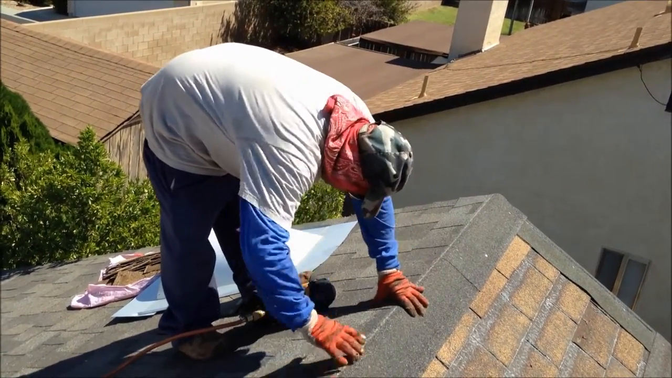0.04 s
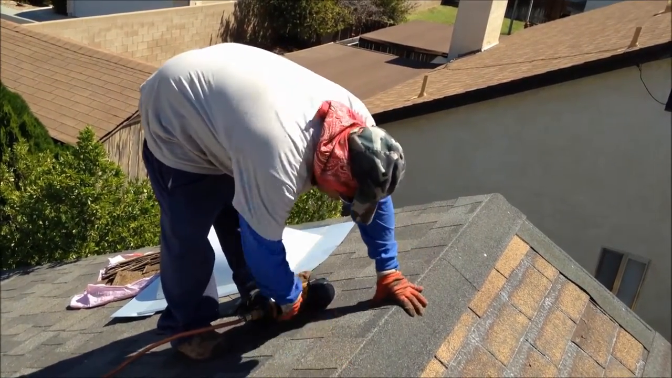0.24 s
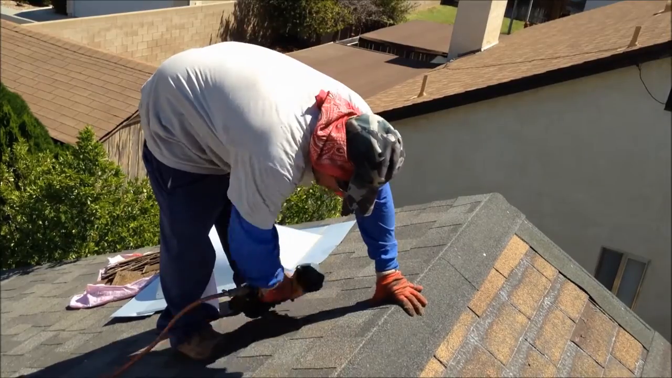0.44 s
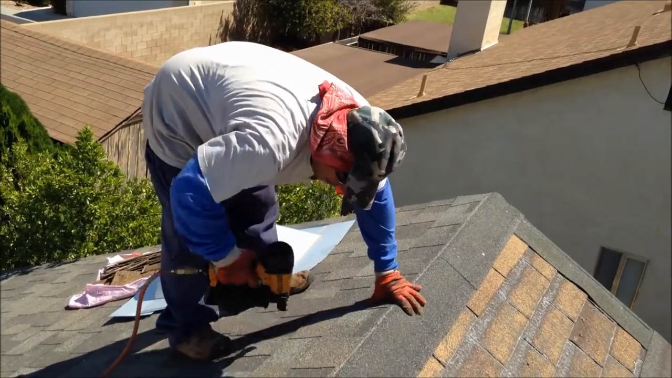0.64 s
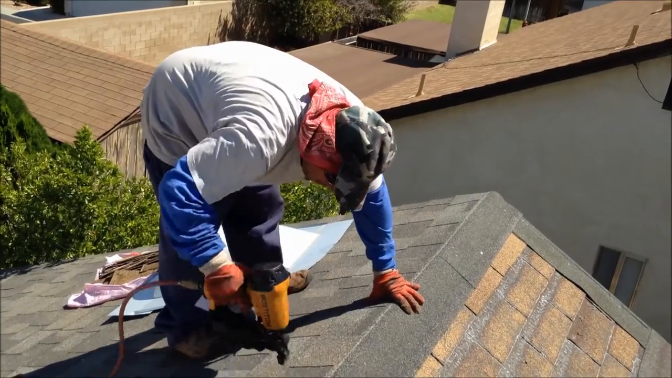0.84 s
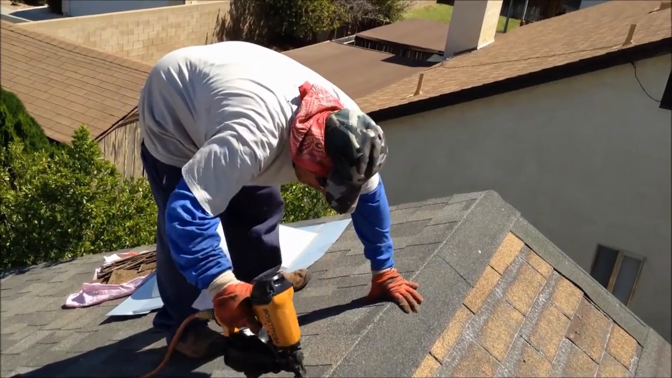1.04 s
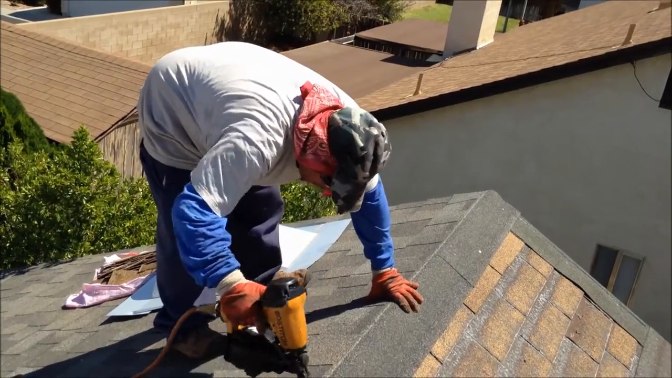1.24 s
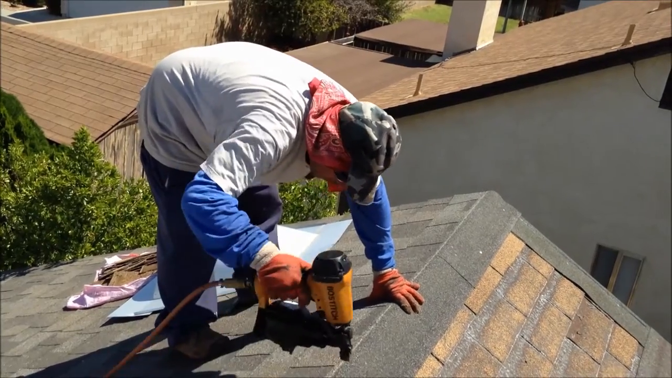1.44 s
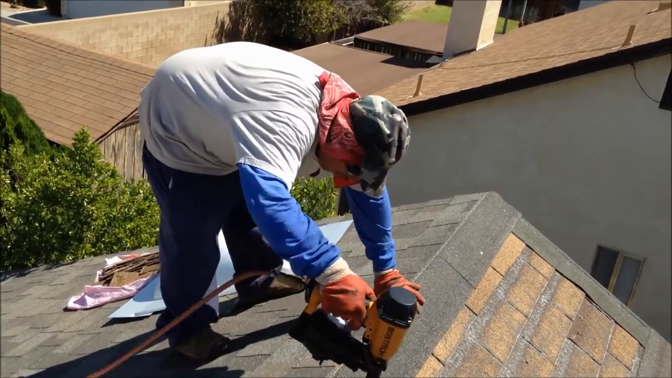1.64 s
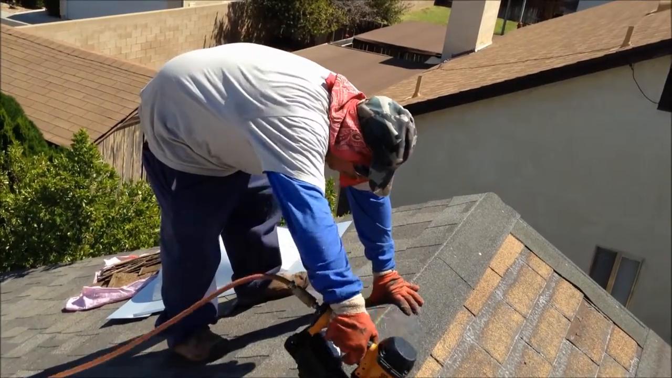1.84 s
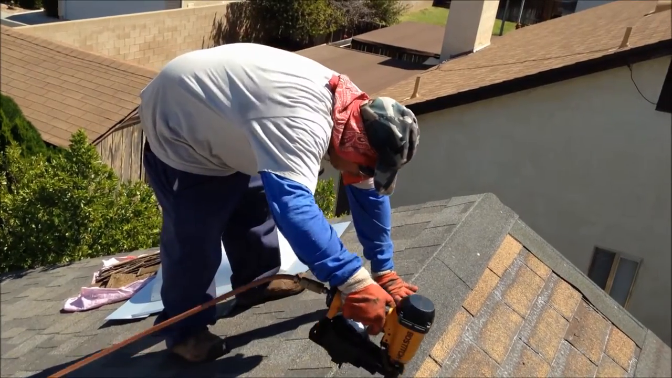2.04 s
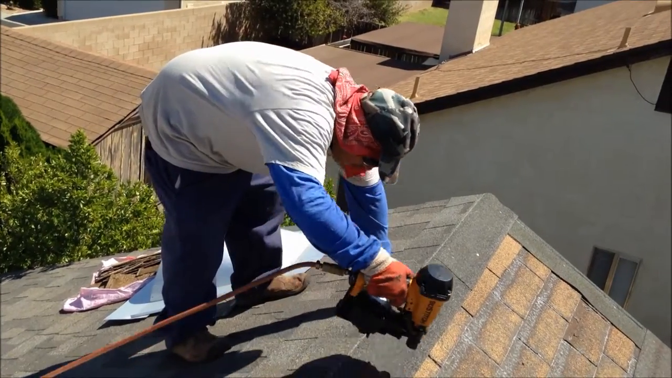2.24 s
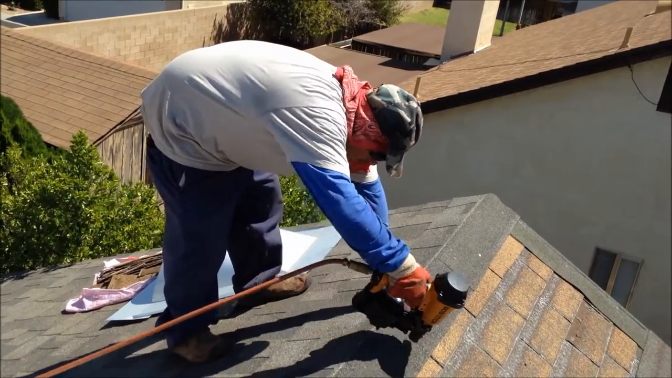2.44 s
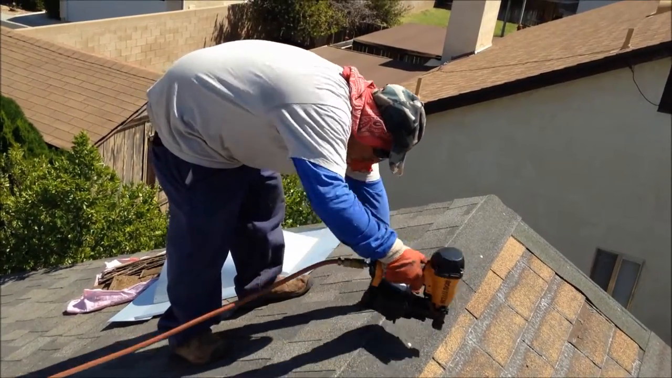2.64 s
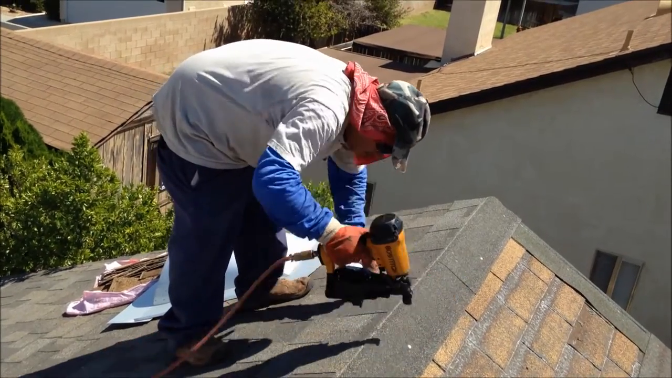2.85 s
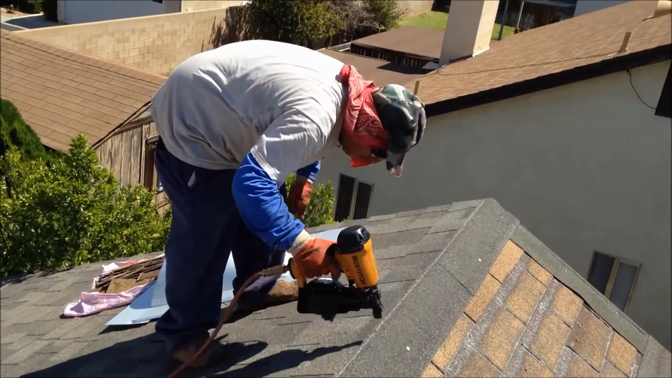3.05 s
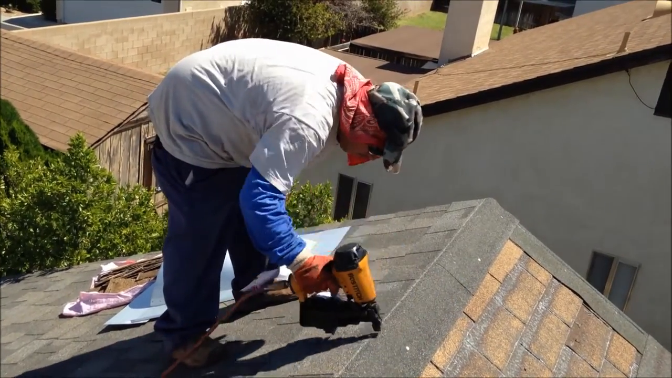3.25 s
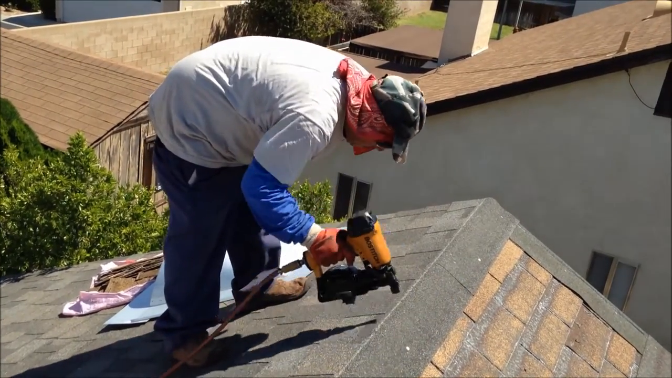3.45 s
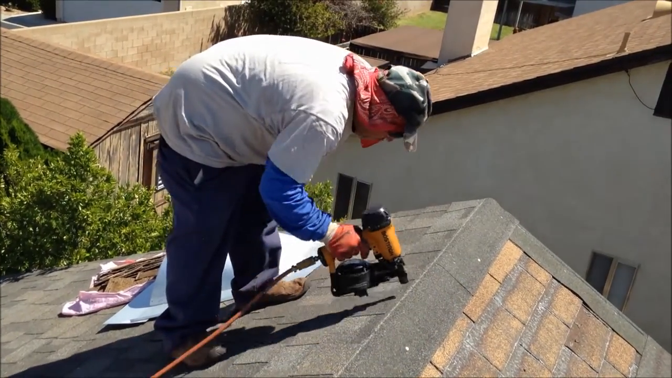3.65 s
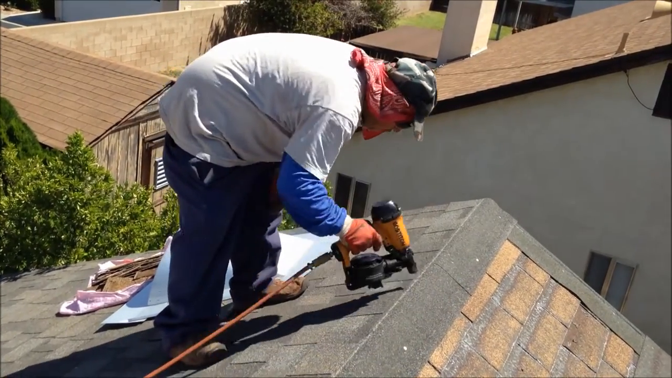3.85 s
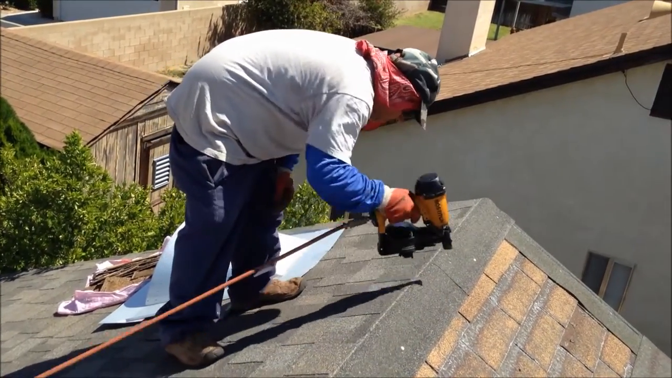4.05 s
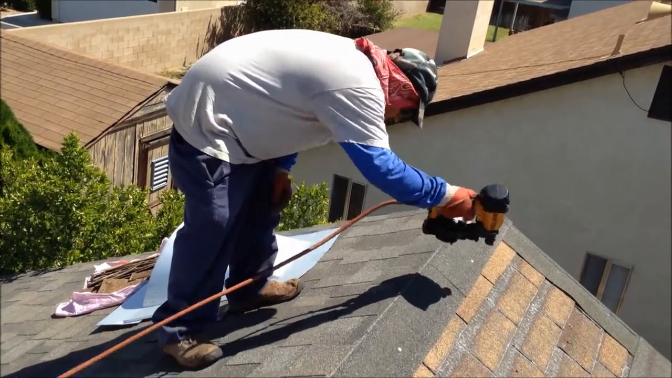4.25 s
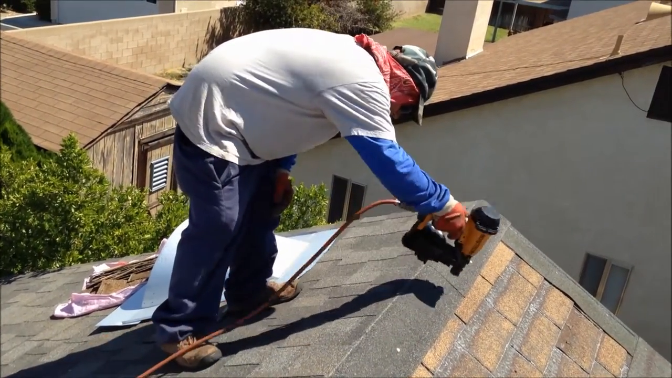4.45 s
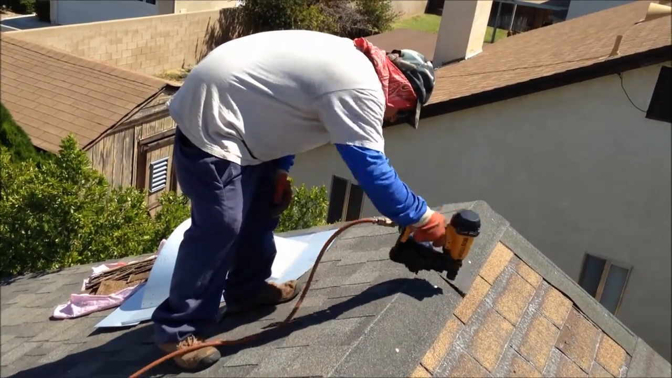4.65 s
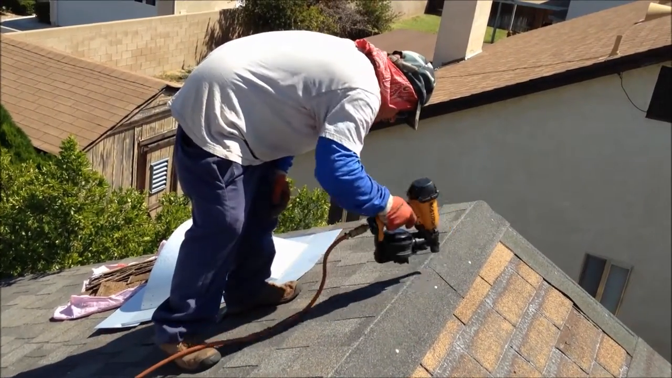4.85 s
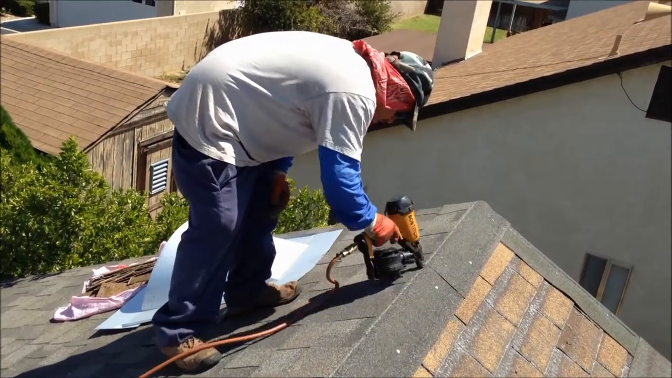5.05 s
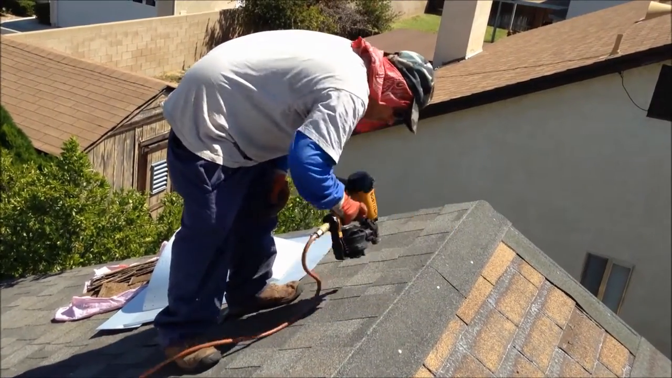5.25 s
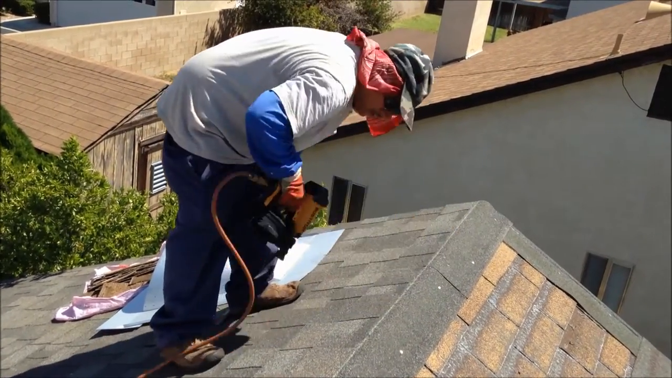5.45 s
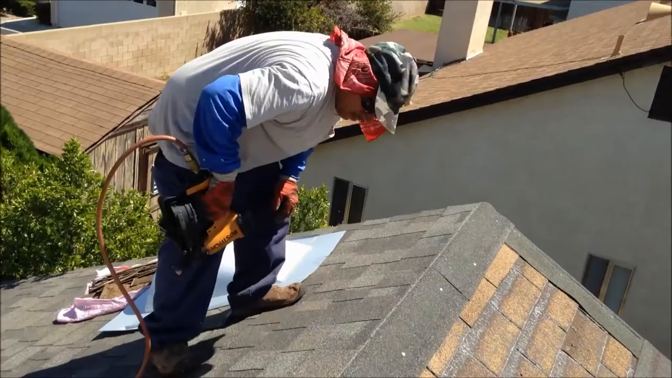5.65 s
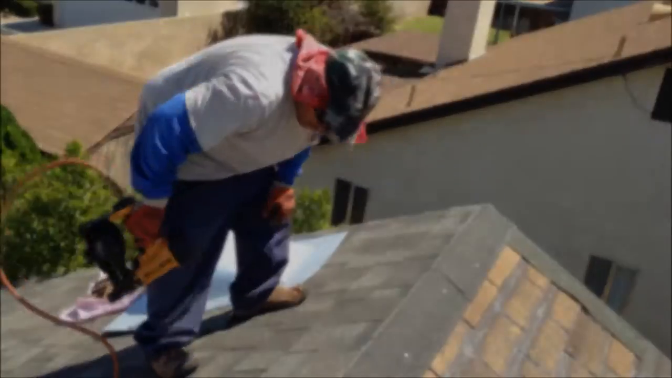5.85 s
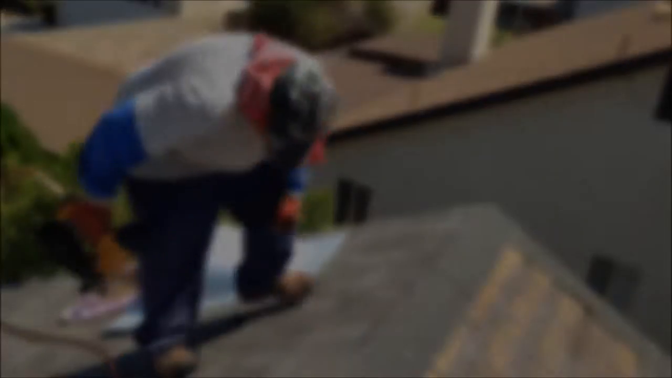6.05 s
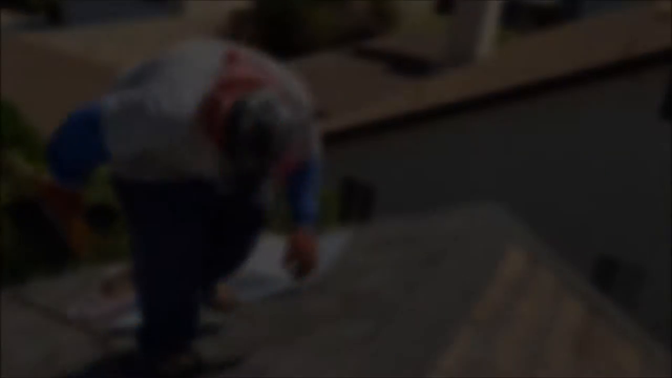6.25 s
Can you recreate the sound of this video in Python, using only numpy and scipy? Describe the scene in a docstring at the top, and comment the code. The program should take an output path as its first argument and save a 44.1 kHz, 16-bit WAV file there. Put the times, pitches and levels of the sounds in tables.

```python
"""On a rooftop outdoors, a roofer close to the microphone fires seven nails into shingles with an air nailer.
Each shot: the nose lands, the valve cracks, the driver slams and rebounds, and exhaust air hisses out.
Nearby houses return diffuse echoes; between shots the tool clicks and rattles and things scuff over the grit.
Impacts are bursts of coloured noise and ringing modes; scuffs are showers of grains.
Wind buffets the microphone as shaped noise and brief swings, over a faint wash of the neighbourhood."""
import sys
import numpy as np
from scipy import signal
from scipy.fft import rfft, irfft, next_fast_len
from scipy.io import wavfile
from scipy.ndimage import uniform_filter1d

SR = 44100
rng = np.random.default_rng(int(sys.argv[2]) if len(sys.argv) > 2 else 0)


def materialize(psi):
    """Save the field psi as 16-bit PCM at rate SR to the path in sys.argv[1].

    A 1-D psi becomes a single channel; in a 2-D psi each row is a channel.
    """
    bounded = np.clip(np.atleast_2d(psi).T, -1, 1)
    quanta = np.round(bounded * 32767).astype(np.int16)
    wavfile.write(sys.argv[1], SR, quanta)


N = 278447  # samples, about 6.3 s


def amp(db):
    """Decibels to gain."""
    return 10 ** (np.asarray(db) / 20)


def evened(x):
    """Scales to an rms of 1."""
    return x / np.sqrt(np.mean(x ** 2) + 1e-20)


def read(points, hz):
    """Reads a table on a logarithmic frequency axis."""
    f, value = np.transpose(points)
    return np.interp(np.log(hz + 1), np.log(f + 1), value)


def level(curve):
    """A curve of (t/s, level/dB) as a gain for every sample."""
    return amp(np.interp(np.arange(N) / SR, *np.transpose(curve)))


def swells(rows, build):
    """Sums bells of (peak t/s, level/dB, length/s); each takes the share build of its length to rise."""
    t = np.arange(N) / SR
    total = np.zeros(N)
    for s, db, length in rows:
        width = length * np.where(t < s, build, 1 - build)
        total += amp(db) * np.exp(-((t - s) / width) ** 2)
    return total


def add(mix, s, sound):
    """Mixes a sound in at time s."""
    part = mix[max(round(s * SR), 0):][:len(sound)]
    part += sound[:len(part)]


def coloured(x, colour):
    """Filters by a table of (f/Hz, level/dB)."""
    size = next_fast_len(len(x))
    gain = amp(read(colour, np.fft.rfftfreq(size, 1 / SR)))
    return irfft(rfft(x, size) * gain, size)[:len(x)]


def noise(colour, size):
    """Coloured noise with an rms of 1."""
    return evened(coloured(rng.standard_normal(size), colour))


def dying(t, t60):
    """Falls by 60 dB in t60 seconds."""
    return np.exp(-np.log(1000) * t / t60)


def burst(colour, t60, rise_s):
    """A short dying noise, like an impact on a thing with very many close modes."""
    t = np.arange(SR // 4) / SR
    return noise(colour, len(t)) * (1 - np.exp(-t / rise_s)) * dying(t, t60)


def ring(modes, rise_s, detune):
    """Struck modes sound as dying sines, tuned a little differently by each contact."""
    t = np.arange(SR // 4) / SR
    tones = np.zeros(len(t))
    for hz, db, t60 in modes:
        tuned_hz = hz * (1 + detune * rng.standard_normal())
        tones += amp(db) * dying(t, t60) * np.sin(2 * np.pi * tuned_hz * t)
    return tones * (1 - np.exp(-t / rise_s))


# colour of the distant wash outdoors: (f/Hz, level/dB)
WASH_COLOUR = [(20, -6.5), (60, 1), (120, 3.5), (230, -3), (400, 1.5), (600, -4), (900, -0.5), (1500, -8.5),
               (2500, -8), (5000, -23), (10000, -27.5), (15000, -28)]


def neighbourhood(wash_db=-57.5):
    """The distant wash of the neighbourhood, a steady coloured noise."""
    return amp(wash_db) * noise(WASH_COLOUR, N)


# the breeze at the microphone between gusts: (t/s, level/dB)
BREEZE_LEVEL = [(0, -50.5), (1.2, -53), (1.5, -60), (2.33, -64), (2.55, -52), (3.75, -48), (4.1, -62),
                (4.55, -48), (5, -62), (5.5, -45), (6.31, -54)]
# gusts, each building up and dropping away: (peak t/s, level/dB, length/s)
GUST_SWELLS = [(1.14, -48, .06), (2.46, -35, .04), (2.65, -30, .11), (2.85, -35.5, .06), (3.03, -39.5, .05),
               (3.13, -31, .05), (3.225, -21.5, .07), (3.49, -41, .08), (3.7, -38.5, .15), (4.29, -46, .12),
               (5.73, -35.5, .12), (6.07, -34.5, .13)]
# single eddies rolling past the microphone: (t/s, level/dB, length/s, swing f/Hz)
EDDY_SWINGS = [(2.577, -27, 0.012, 130), (2.617, -15, 0.016, 150), (3.204, -13.5, 0.012, 200),
               (3.228, -17, 0.013, 170), (3.263, -22.5, 0.03, 210), (3.764, -27, 0.019, 100),
               (4.31, -28.5, 0.023, 105), (5.511, -29.5, 0.013, 130), (5.685, -20, 0.016, 140),
               (5.706, -24, 0.012, 150), (5.987, -22, 0.018, 115), (6.04, -24.5, 0.014, 110)]


def wind(gust_build=.58, strong_db=-18, lumpy_db=3.0, churn_db=-9):
    """Turbulence at the microphone: a low rumble that reaches higher as the pressure grows."""
    t = np.arange(N) / SR
    lumps = noise([(1, -4.5), (20, -0.5), (60, -34.5), (300, -100)], N)
    pressure = (level(BREEZE_LEVEL) + swells(GUST_SWELLS, gust_build)) * amp(lumpy_db * lumps)
    swings = np.zeros(N)
    for s, db, length, hz in EDDY_SWINGS:
        # an eddy is a brief swing of pressure with churning air inside it
        swell = amp(db) * np.exp(-(2 * (t - s) / length) ** 2)
        swings += swell * np.sin(2 * np.pi * (hz * t + rng.random()))
        pressure = pressure + amp(churn_db) * swell
    gentle = noise([(5, -51.5), (22, -24.5), (45, -2.5), (85, 2), (165, -5.5), (300, -17.5),
                    (600, -46.5), (2000, -85.5), (8000, -110)], N)
    fierce = noise([(5, -48), (22, -11.5), (60, -6), (250, 1.5), (420, -4), (750, -17.5),
                    (1500, -35), (4000, -65), (12000, -100)], N)
    # at strong_db and above, the fierce colour takes over completely
    share = np.minimum(pressure / amp(strong_db), 1) ** 1.1
    return swings + pressure * (np.sqrt(1 - share ** 2) * gentle + share * fierce)


# the neighbourhood's reverberation time: (f/Hz, t60/s)
TAIL_DECAY = [(100, 0.02), (500, 0.38), (1200, 0.49), (4000, 0.49), (8000, 0.4553), (15000, 0.15)]
# colour of that reverberation: (f/Hz, level/dB)
TAIL_COLOUR = [(60, -6), (250, 2.5), (700, -1.5), (1200, -3), (2500, -0.5), (5000, -6.5), (9000, -4),
               (15000, -3)]
# echoes from the houses around: (delay t/s, level/dB, f/Hz above which the air has dulled it)
HOUSE_WALLS = [(.091, -23.5, 5500), (.143, -25, 3800), (.294, -39, 2000), (.345, -31.5, 1800)]
# colour shared by the wall echoes: (f/Hz, level/dB)
WALL_COLOUR = [(60, -9), (300, -1.5), (700, -1.5), (1200, -0.5), (2500, -1.5), (15000, 2.5)]


def houses(x, walls_db, tail_db=-19.5, scatter_t60=.018, near_s=.14):
    """Walls and eaves scatter echoes, and roofs and trees a diffuse tail; walls_db acts less on far walls."""
    time = np.arange(SR) / SR
    # 2500 random reflections a second, dying at each frequency's own rate
    taps = rng.standard_normal(SR) * (rng.random(SR) < 2500 / SR)
    hz, t, z = signal.stft(taps, SR, nperseg=256)
    faded = z * dying(t, read(TAIL_DECAY, hz)[:, None])
    tail = signal.istft(faded, SR, nperseg=256)[1][:SR]
    tail = tail * np.minimum(time / .02, 1)
    walls = np.zeros(SR)
    for delay, db, dull_hz in HOUSE_WALLS:
        echo = rng.standard_normal(SR // 8) * dying(time[:SR // 8], scatter_t60)
        dulled = signal.lfilter(*signal.butter(2, dull_hz, fs=SR), echo / np.linalg.norm(echo))
        add(walls, delay, amp(db + walls_db * min(1, near_s / delay)) * dulled)
    response = amp(tail_db) * coloured(tail / np.linalg.norm(tail), TAIL_COLOUR)
    response = response + coloured(walls, WALL_COLOUR)
    return signal.fftconvolve(x, response)[:len(x)]


def echoes(x, walls_db, count=4, slice_s=.007):
    """Crossfaded slices of a sound scatter differently, so the echoes come back diffuse."""
    turn = np.arange(len(x)) / SR / slice_s
    out = np.zeros(len(x))
    for k in range(count):
        away = np.minimum(abs((turn - k + count / 2) % count - count / 2), 1)
        out += houses(x * np.cos(np.pi / 2 * away), walls_db)
    return out


# colour of a small part tapping the tool: (f/Hz, level/dB)
TICK_COLOUR = [(100, -14.5), (600, -6), (1100, 8.5), (4000, 1), (9000, -9), (15000, -6)]
# resonances of the nailer's housing and magazine: (f/Hz, level/dB, t60/s)
HOUSING_MODES = [(1102, 2.5, 0.085), (1220, 2.5, .04), (1690, -7, .04), (2130, 2, .04), (2550, -0.5, .035),
                 (3230, -3.5, 0.036), (3980, -1.5, .03), (4400, -1, 0.034), (5000, -6.5, .03),
                 (6900, -5, .025), (11400, -8.5, 0.023), (14600, -1.5, .02)]


def click(t60, centre_hz, ring_db=-16, focus_db=7, thin_db=-19):
    """A small part taps the housing; the harder the contact, the higher the modes it favours."""
    tap = burst(TICK_COLOUR, t60, rise_s=0.00038)
    tap = tap + amp(ring_db) * ring(HOUSING_MODES, rise_s=0.00027, detune=.008)
    focus = [(centre_hz / 3, thin_db), (centre_hz / 1.45, 1), (centre_hz, focus_db / 2),
             (centre_hz * 4, -focus_db)]
    return coloured(tap, focus)


# strokes of boots, hose and clothes over the gritty shingles: (peak t/s, level/dB, length/s)
RUB_STROKES = [(.075, -56, .08), (.42, -61, .12), (1.71, -54.5, .11), (1.92, -61, .08), (2.42, -53.5, .24),
               (3.12, -57, .36), (3.7, -61, .16), (4.31, -52.5, .2), (4.505, -45, .04), (5.05, -60, .2),
               (5.58, -57, .2), (5.78, -42, .06), (6.05, -55.5, .14)]
# colour of the ticking granules: (f/Hz, level/dB)
GRIT_COLOUR = [(100, -8.5), (700, 3), (1200, 0.5), (2000, -3), (3700, -6.5), (7000, -10.5), (11000, -18),
               (15000, -16.5)]


def scuffing(rub_build=.55, rustle_db=-70, grains_per_s=5000, spread_db=3.5, catch_db=3.0,
             snaps_per_s=30, snap_db=-16, snap_t60=.006, snap_hz=10000):
    """Shingle granules tick as things drag over them, catching and slipping; a few snap loose."""
    size = amp(spread_db * np.minimum(rng.exponential(1, N), 5))
    grains = size * rng.choice([-1, 1], N) * (rng.random(N) < grains_per_s / SR)
    catching = amp(catch_db * noise([(1, 0.5), (30, -1.5), (90, -41.5), (400, -100)], N))
    snap_hits = rng.random(N) * (rng.random(N) < snaps_per_s / SR)
    snaps = signal.oaconvolve(snap_hits, click(snap_t60, snap_hz, ring_db=-26))[:N]
    # the roofer is never quite still, so a faint rustle stays under the strokes
    drag = amp(rustle_db) + swells(RUB_STROKES, rub_build)
    return drag * (evened(coloured(grains * catching, GRIT_COLOUR)) + amp(snap_db) * evened(snaps))


def rattle(start_s=5.803, gap_s=.0216, first_db=-33.5, fade_db_per_s=-35, count=5, t60=.0085,
           centre_hz=5800, uneven_db=2, uneven_s=.0007, uneven_colour=.3):
    """As the tool swings back, the coil's nails tap the magazine in a loose run of fading clicks."""
    out = np.zeros(N)
    for k in range(count):
        after = k * gap_s
        louder, later, brighter = rng.standard_normal(3)
        db = first_db + fade_db_per_s * after + uneven_db * louder
        tap_hz = centre_hz * np.exp(uneven_colour * brighter)
        tap = click(t60, tap_hz, ring_db=-22, thin_db=-13)
        add(out, start_s + after + uneven_s * later, amp(db) * tap)
    return out


# the steel nose lands on the shingle and its safety slides in: (t/s, level/dB, t60/s)
NOSE_LANDINGS = [(1.2826, -30.5, .02), (1.286, -12, .02), (1.2913, -14.5, 0.035), (1.9709, -31.5, .02),
                 (1.9764, -27.5, 0.058), (1.997, -21.5, 0.053), (2.635, -31.5, 0.072), (2.6488, -14, 0.03),
                 (3.3204, -26, .02), (3.326, -16.5, 0.025), (3.33, -18.5, 0.032), (3.882, -22.5, 0.042),
                 (3.888, -16.5, 0.047), (4.6743, -22, .02), (4.6778, -12.5, 0.042), (5.1424, -19, 0.016),
                 (5.145, -18.5, 0.047)]
# colour of the steel nose: (f/Hz, level/dB)
STEEL_COLOUR = [(40, -9), (280, -1.5), (600, -10), (1200, -7), (1650, -6.5), (2150, 1), (2650, -7.5),
                (3900, 2), (5700, -7.5), (7300, -7.5), (8800, -9), (14500, -9)]
# the tool clicks as it is handled; the row at 5.072 s is instead a faint return of the previous shot's blow
# from a far wall: (t/s, level/dB, t60/s, favoured f/Hz)
TOOL_CLICKS = [(.419, -40, 0.0098, 12000), (0.501, -44.5, .03, 2000), (.533, -28, 0.031, 3800),
               (0.5397, -22, 0.016, 5040), (0.542, -24.5, 0.054, 1190), (0.5712, -28, .025, 2020),
               (0.579, -32.5, 0.028, 1250), (0.7988, -27.5, 0.018, 3000), (0.8432, -35.5, 0.024, 4500),
               (0.928, -44, 0.12, 2410), (1.091, -47, 0.045, 1850), (1.632, -47, 0.16, 6900),
               (2.478, -40, 0.028, 4000), (2.556, -49, 0.033, 4500), (3.725, -42, 0.08, 3000),
               (4.505, -32, 0.033, 2300), (5.072, -43, 0.043, 3000), (5.77, -27, 0.013, 1960),
               (5.924, -38, 0.0071, 8000), (6.033, -44, 0.0069, 6000), (6.144, -40.5, 0.016, 3970),
               (6.161, -40, .006, 5060)]
# dull knocks on the roof deck: (t/s, level/dB, t60/s)
DECK_KNOCKS = [(.374, -43, 0.065), (1.706, -33.5, 0.17), (3.033, -22, 0.15), (4.497, -42, .1)]
# colour of the roof deck: (f/Hz, level/dB)
DECK_COLOUR = [(60, -8.5), (300, -0.5), (560, 3.5), (800, -6.5), (1280, -2), (1700, -8.5), (4000, -13.5),
               (8000, -26.5), (15000, -40)]


def handling(nose_ring_db=-20):
    """Contacts close by: the nose lands and rings the housing, loose parts click, the deck knocks."""
    out = np.zeros(N)
    for s, db, t60 in NOSE_LANDINGS:
        landing = burst(STEEL_COLOUR, t60, rise_s=.0004)
        landing = landing + amp(nose_ring_db) * ring(HOUSING_MODES, rise_s=.0004, detune=.004)
        add(out, s, amp(db) * landing)
    for s, db, t60, centre_hz in TOOL_CLICKS:
        add(out, s, amp(db) * click(t60, centre_hz))
    for s, db, t60 in DECK_KNOCKS:
        add(out, s, amp(db) * burst(DECK_COLOUR, t60, rise_s=0.00033))
    return out


def off_roof(x, share=0.29):
    """The shingles reflect the sound a moment later; the path differs wherever the tool is held."""
    lag = round(rng.uniform(.0004, .002) * SR)
    reflected = np.pad(x, (lag, 0))[:len(x)]
    return (x + share * reflected) / np.hypot(1, share)


def boom(hz, t60=0.051):
    """The roof deck flexes under the blow, at a pitch set by the spot between the rafters."""
    return ring([(hz, 0, t60)], rise_s=0.00085, detune=.01)


# colour of the sharp valve crack and driver snap: (f/Hz, level/dB)
CRACK_COLOUR = [(40, -10.5), (250, 2), (550, 2.5), (920, 2.5), (1200, -2.5), (2500, -4), (4200, -2.5),
                (5200, -7.5), (6900, -1.5), (9000, -9), (15000, -3.5)]
# what tool, nail and deck ring with under the driver: (f/Hz, level/dB, t60/s)
DRIVER_MODES = [(290, -10.5, 0.071), (540, -24.5, 0.038), (917, -17, 0.058), (1071, -8, 0.034),
                (1241, 2.5, 0.02), (1670, -11, 0.021), (2120, -12.5, 0.038), (2400, -16.5, 0.016),
                (3300, -14, 0.06), (3530, -14.5, 0.012), (6970, -17.5, 0.035)]


def blow(snap_db=-10):
    """The driver strikes: a hard snap, and tool and deck ring."""
    snap = amp(snap_db) * burst(CRACK_COLOUR, t60=0.023, rise_s=0.00038)
    return snap - ring(DRIVER_MODES, rise_s=.0004, detune=0.023)


# colour of the escaping air: (f/Hz, level/dB)
AIR_COLOUR = [(30, -4), (100, 1.5), (300, 6.5), (420, -1), (540, -1), (1100, -0.5), (2700, -3.5), (3600, 1),
              (5200, -2.5), (6800, 3), (8300, -1), (11000, 1), (14700, 4)]


def exhaust(open_s=.007, hold_s=.017, t60=.112, flutter_db=2.73):
    """The port opens, air rushes out at full speed, then the cylinder pressure runs down."""
    t = np.arange(SR // 4) / SR
    flow = np.minimum(t / open_s, 1) * dying(np.maximum(t - hold_s, 0), t60)
    flutter = evened(uniform_filter1d(rng.standard_normal(len(t)), size=90))
    return noise(AIR_COLOUR, len(t)) * flow * amp(flutter_db * flutter)


# colour of the shaken magazine and the returning piston: (f/Hz, level/dB)
CLATTER_COLOUR = [(40, -23), (280, 7), (450, -4), (1200, 4.5), (1800, 0.5), (2700, -4), (3900, 3),
                  (5300, -5), (7000, -3), (9000, -2), (15000, -5.5)]
# colour of the hollow chuff at the start of the exhaust: (f/Hz, level/dB)
CHUFF_COLOUR = [(100, -13), (350, -12.5), (530, -4), (720, -5.5), (1100, -21.5), (4000, -50)]
# one row a shot: (valve crack t/s, crack level/dB, driver blow level/dB, rebound level/dB, deck boom f/Hz,
# boom level/dB relative to the blow, exhaust delay t/s, exhaust level/dB, chuff level/dB, wall echo level/dB)
NAIL_SHOTS = [(1.3013, -3, -5, -13.5, 152, -7, 0.025, -8.5, -9, -3.5),
              (2.0117, -6, -2, -11, 175, -16, 0.022, -8.5, -12, -5.5),
              (2.6581, -3.5, -4.5, -5, 129.6, -12, .0235, -11, -15, -1.5),
              (3.3394, -3, -4, -6, 165, -20, .022, -9.3, -9.5, -2),
              (3.8975, -5.5, -5.5, -10.5, 261, -16, .021, -10.3, -24.5, 0.5),
              (4.6888, -3.5, -4, -9, 83.7, -13, .0245, -8.6, -18, -0.5),
              (5.1546, -3.5, -7.5, -12, 270, -18, 0.026, -10.5, -27, 3.5)]


def nailer(stroke_s=.0084, rebound_s=.0134, clatter_db=-12, housing_db=-22, return_s=0.052, return_db=-19):
    """Valve crack, driver blow, rebound, exhaust, and the piston clicking home; each shot has its own echoes."""
    out = np.zeros(N)
    for s, crack_db, blow_db, rebound_db, deck_hz, boom_db, air_s, air_db, chuff_db, walls_db in NAIL_SHOTS:
        shot = np.zeros(SR)
        crack = 1.42 * burst(CRACK_COLOUR, t60=0.0093, rise_s=0.00017)
        crack = crack + 0.29 * burst(CRACK_COLOUR, t60=0.032, rise_s=.0007)
        add(shot, 0, amp(crack_db) * crack)
        add(shot, stroke_s, amp(blow_db) * (blow() - amp(boom_db) * boom(deck_hz)))
        add(shot, rebound_s, amp(rebound_db) * blow())
        # the magazine shakes with the recoil
        clatter = off_roof(burst(CLATTER_COLOUR, t60=0.19, rise_s=0.00035))
        add(shot, stroke_s, amp(clatter_db) * clatter)
        chuff = burst(CHUFF_COLOUR, t60=0.085, rise_s=0.0074)
        add(shot, air_s, amp(air_db) * off_roof(exhaust()) + amp(chuff_db) * chuff)
        home = burst(CLATTER_COLOUR, t60=0.027, rise_s=.00045)
        home = home + amp(housing_db) * ring(HOUSING_MODES, rise_s=.0005, detune=.004)
        add(shot, return_s, amp(return_db) * home)
        add(out, s, shot + echoes(shot, walls_db))
    return out


def scene():
    """The distant wash, wind at the microphone, and the work on the roof with its echoes."""
    background = neighbourhood() + wind()
    work = handling() + rattle() + scuffing()
    return (background + work + houses(work, walls_db=-5) + nailer())[None]


def record(dry, low_cut_hz=33, edge_hz=15480):
    """The microphone drops the deepest bass, the loudest peaks are rounded off; then the band limit."""
    heard = signal.sosfilt(signal.butter(2, low_cut_hz, "highpass", fs=SR, output="sos"), dry)
    rounded = heard / (1 + (heard / .92) ** 4) ** (1 / 4)
    band = signal.firwin(601, edge_hz, window=("kaiser", 8), fs=SR)
    return signal.oaconvolve(rounded, band[None], "same")


dry = scene()
out = record(dry)
materialize(out)
```